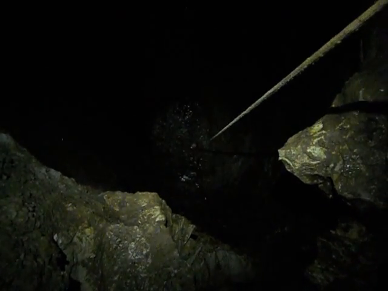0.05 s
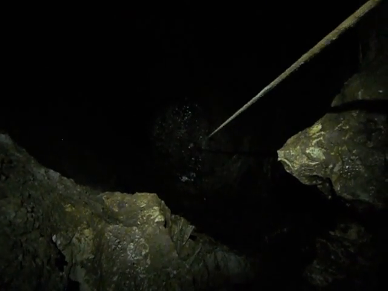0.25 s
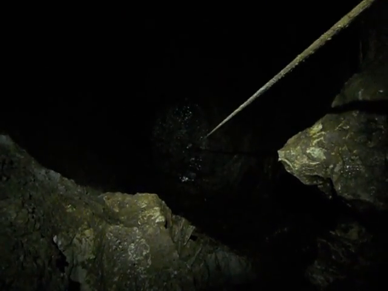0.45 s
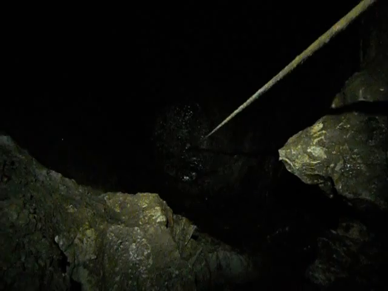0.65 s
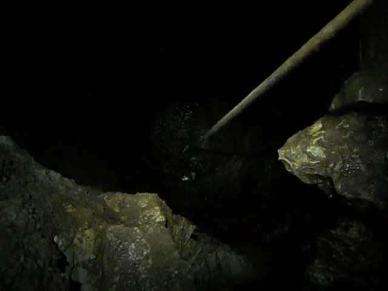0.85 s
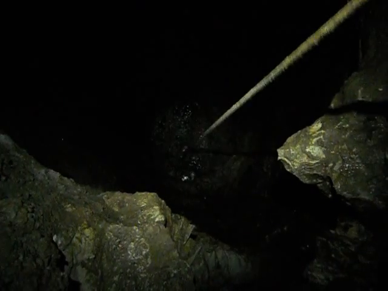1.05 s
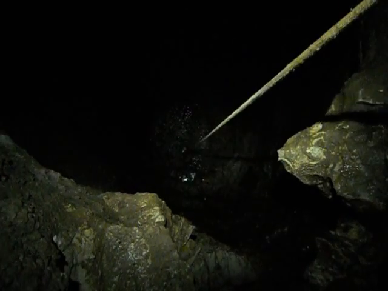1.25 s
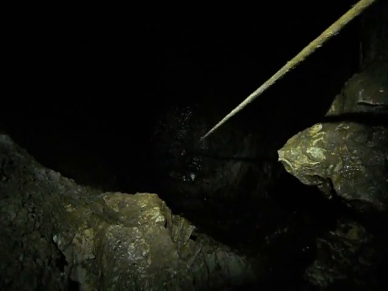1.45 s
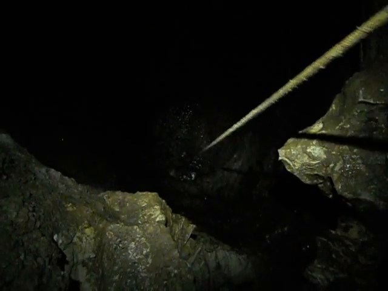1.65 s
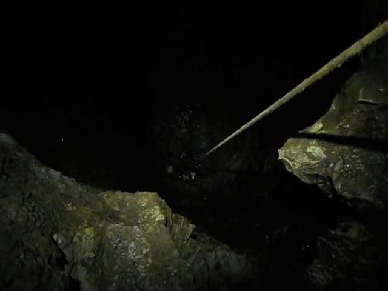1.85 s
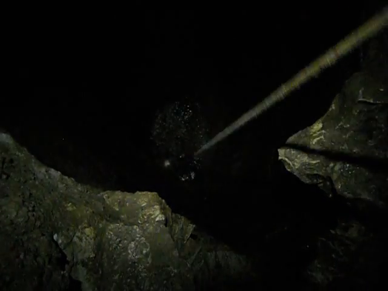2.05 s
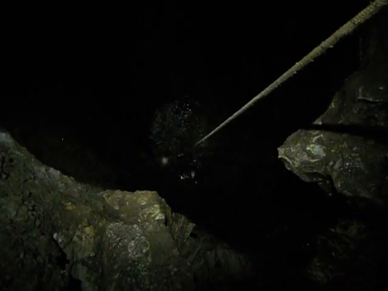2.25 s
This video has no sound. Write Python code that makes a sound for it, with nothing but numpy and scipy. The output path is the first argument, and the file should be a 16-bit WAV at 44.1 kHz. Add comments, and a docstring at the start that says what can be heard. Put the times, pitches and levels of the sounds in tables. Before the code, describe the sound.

A stone falls down a deep cave pit, heard from the rim. Soft rustles and a faint dying rumble come first. At about 0.6 seconds the stone clips the wall with a sharp, very quick double knock and a bright echo. At 0.9 seconds it lands far below, raising a low boom that rolls back in waves and slowly fades. Faint drips tick from 1.4 seconds, mostly around 2.

```python
"""A stone falls down a deep cave pit, clipping the wall with a sharp double knock.
Each blow snaps, crushes a little grit and rings the stone; the shaft answers with a bright clack.
The landing far below piles its echoes into a low boom that rolls back up in waves.
Soft rustles come and go near the rim, and a few drips tick over the cave air as the boom fades."""
import sys
import numpy as np
from scipy import signal
from scipy.fft import rfft, irfft, next_fast_len
from scipy.io import wavfile

SR = 44100
rng = np.random.default_rng(int(sys.argv[2]) if len(sys.argv) > 2 else 0)


def dump_mix(stems):
    """Bounce the given channels to the path in sys.argv[1] as a 16-bit WAV at rate SR."""
    frames = np.atleast_2d(stems).T  # one column per channel
    limited = np.clip(frames, -1, 1)  # hard clip at full scale
    pcm = np.round(limited * 32767).astype(np.int16)
    wavfile.write(sys.argv[1], SR, pcm)


N = 101429
TIME = np.arange(N) / SR

# glancing blows: (time [s], level [dB], snap pitch [Hz], contact time [s], send to the shaft [dB])
BLOWS = [(0.5775, -11.5, 3594, 0.00067, -9.5), (.5894, 0.5, 5115, 0.000283, 0)]
# the stone's ring: (frequency [Hz], relative level [dB], t60 [s])
STONE_MODES = [(1298, -14.5, 0.022), (2080, -11, 0.021), (2600, -5.5, 0.021), (3012, -6.5, 0.043),
               (3468, -6.5, 0.0127), (3738, -8, .018), (4955, -12, 0.021), (5134, -2, 0.0124),
               (5510, -10.5, 0.022), (6900, -11, 0.017)]
# rock crushed at the contact: (frequency [Hz], relative level [dB])
GRIT_SPECTRUM = [(200, -19.5), (700, -5.5), (1600, 5.5), (4000, 1.5), (6500, 1.5), (9000, 1.5),
                 (13000, -5.5)]
# slaps off the nearest walls: (delay [s], level [dB])
WALL_ECHOES = [(.0023, -15.5), (.0046, -13.5), (0.0113, -9.5)]
# the shaft's answer to a knock: (frequency [Hz], relative level [dB])
CLACK_SPECTRUM = [(100, -39), (350, -15.5), (700, -5), (1350, 0.5), (2000, -1.5), (2750, 1), (4200, -0.5),
                  (5400, 4), (5900, -4.5), (8000, -8), (14000, -20.5)]
# its tail: (frequency [Hz], t60 [s])
CLACK_DECAY = [(300, 1.84), (1300, 1.497), (3000, 1.319), (5400, 0.962), (7500, 0.898), (12000, 1.13)]
# the landing: (frequency [Hz], relative level [dB])
BOOM_SPECTRUM = [(22, -33.5), (32, -20.5), (42, -5), (56, -21), (90, -4), (125, 0.5), (168, 0.5),
                 (205, -2.5), (290, -4), (370, -2.5), (470, -6.5), (570, -9.5), (780, -8.5), (1300, -14.5),
                 (2200, -21), (5000, -24), (12000, -36.5)]
# the tail of boom and rumble: (frequency [Hz], t60 [s])
SHAFT_DECAY = [(40, 10.94), (110, 4.5), (180, 4.35), (400, 3.137), (900, 2.553), (2500, 2.476),
               (8000, 1.28)]
# the boom's low waves: (time [s], attack [s], hold [s], t60 [s], level [dB], pitch [Hz], width [Hz])
BOOM_SURGES = [(1.028, 0.0755, 0.0193, 0.69, -26.5, 171.1, 30),
               (1.288, 0.052, 0.126, 0.58, -33.5, 175, 111)]
# rustles at the rim: (time [s], attack [s], hold [s], base t60 [s], level [dB],
# resonance [Hz], resonance mix [dB], starting pitch offset [Hz])
RIM_RUSTLES = [(-.01, 0.026, 0.0434, 0.74, -39.5, 4130, -8, 99),
               (.17, 0.0618, 0.0146, 1.088, -31.5, 3764, -7.5, -800),
               (0.47, 0.038, 0.077, 0.306, -31, 3812, -7, 499.5),
               (0.896, 0.0496, 0.1277, 1.607, -35.5, 3637, -3, -120)]
# their rubbing tone: (frequency [Hz], relative level [dB])
RUSTLE_SPECTRUM = [(200, -15), (700, -1.5), (1200, 0), (1700, -1), (2150, 1.5), (2850, -1), (4400, 1.5),
                   (6500, -1.5), (8000, -3.5), (10000, -3), (14000, -9)]
# how long each band hangs on: (frequency [Hz], t60 stretch [factor])
RUSTLE_STRETCH = [(1000, 2.86), (4000, 1.302), (10000, 0.656)]
# drips and spatters: (time [s], level [dB], pitch [Hz], spread [octaves], attack [s], t60 [s])
CAVE_DRIPS = [(1.372, -44.5, 5530, 0.11, 0.016, 0.31), (1.896, -42.5, 9200, 0.49, .002, 0.069),
              (1.928, -49.5, 6810, 0.244, 0.0126, 0.112), (2.025, -46.5, 6900, 0.32, .012, 0.13),
              (2.05, -50.5, 6010, 0.12, 0.016, 0.47), (2.074, -47, 10500, .3, .002, .06),
              (2.194, -41, 10000, 0.514, 0.0029, 0.095)]
# a rumble already dying in the shaft: (frequency [Hz], relative level [dB])
RUMBLE_SPECTRUM = [(30, -21), (90, -8), (160, 2.5), (240, -6), (600, -10.5), (1400, -6.5), (2100, -22),
                   (6000, -10.5), (14000, -19)]
# faint swells in the shaft: (time [s], attack [s], level [dB], t60 [s])
SHAFT_SWELLS = [(.5, 0.077, -39, 0.153), (2.215, 0.0776, -43.5, 1.57)]
# their dull tone: (frequency [Hz], relative level [dB])
SWELL_SPECTRUM = [(60, -9), (250, 0), (700, 0), (1500, -5.5), (2400, -8.5), (3500, -18.5), (12000, -32)]
# cave air and hiss: (frequency [Hz], relative level [dB])
AIR_SPECTRUM = [(25, -0.5), (45, 8), (80, -2.5), (160, 9), (400, 0.5), (1200, -6), (4000, -9), (6500, -8.5),
                (9000, -10), (14000, -10.5)]
# microphone colour: (frequency [Hz], gain [dB])
MIC_EQ = [(20, -1), (9000, 0.5), (10200, -0.5), (11050, -13.5), (11800, -7.5), (12500, -13.5),
          (13500, -27.5), (14200, -32.5)]

RING_DB, GRIT_DB, GRIT_T60_S = -12, -3, 0.00796
CLACK_DB, CLACK_RING_DB, CLACK_WIDTH_HZ, WALL_ATTACK_S = -17.5, -10, 42.6, 0.00165
THUD_DB, THUD_HZ, THUD_WIDTH_HZ, THUD_T60_S = -25, 482.5, 600, 0.0023
BOOM_START_S, BOOM_DB, BOOM_ATTACK_S, BOOM_HOLD_S = 0.902, -24, 0.0161, 0.239
RUSTLE_WIDTH_HZ, GLIDE_S, RING_HOLD_FACTOR = 452, 0.053, 1.934
GRAIN_DB, GRAIN_HZ = 0.99, 250
DRIP_ECHO_DB, DRIP_ECHO_T60_S = -15, 0.81
AIR_DB, RUMBLE_DB = -43, -37.5
DETECTOR_S, THRESHOLD_DB, DUCK_SHARE, RELEASE_DB_PER_S = 0.00623, -21.5, 0.354, 22
CLIP_CEILING, LOWPASS_HZ = 0.92, 14150


def knock(start, db, hz, contact):
    """Stone meets rock: a contact snap, the stone's short ring and a puff of grit."""
    age = np.maximum(TIME - start, 0)
    progress = age / contact
    snap = progress * np.exp(1 - progress) * np.sin(2 * np.pi * hz * age)
    ring = sum((-1) ** k * amp(level) * fall(age, t60) * np.sin(2 * np.pi * mode_hz * age)
               for k, (mode_hz, level, t60) in enumerate(STONE_MODES))
    grit = amp(GRIT_DB) * wash(GRIT_SPECTRUM) * np.minimum(progress, 1) * fall(age, GRIT_T60_S)
    return amp(db) * (snap + amp(RING_DB) * ring) + amp(db / 2) * grit  # soft blows are grittier


def wall_thud():
    """The rock wall gives a short dull push at the first contact."""
    start = BLOWS[0][0]
    body = amp(THUD_DB) * band(THUD_HZ, THUD_WIDTH_HZ)
    return body * rise(start, WALL_ATTACK_S) * fall(TIME - start, THUD_T60_S)


def shaft_clack():
    """Each blow feeds dense echoes, tinted by the stone's modes; they fade from the last blow on."""
    ring = unit(sum(amp(db) * band(hz, CLACK_WIDTH_HZ) for hz, db, _ in STONE_MODES))
    echoes = wash(CLACK_SPECTRUM) + amp(CLACK_RING_DB) * ring
    power = sum((amp(send) * rise(start, WALL_ATTACK_S)) ** 2 for start, *_, send in BLOWS)
    return amp(CLACK_DB) * np.sqrt(power) * fade_bands(echoes, BLOWS[-1][0], CLACK_DECAY)


def wall_blows():
    """The double knock with its near-wall slaps, thud and bright tail."""
    direct = sum(knock(*row[:4]) for row in BLOWS)
    slaps = sum(amp(db) * np.roll(direct, round(delay * SR)) for delay, db in WALL_ECHOES)
    return direct + slaps + wall_thud() + shaft_clack()


def boom():
    """The landing arrives as dense echoes that pile up, then fade, the bass last."""
    echoes = fade_bands(wash(BOOM_SPECTRUM), BOOM_START_S + BOOM_HOLD_S, SHAFT_DECAY)
    return amp(BOOM_DB) * rise(BOOM_START_S, BOOM_ATTACK_S) * echoes


def surge(start, attack, hold, t60, db, hz, width):
    """The boom returns from the depth on the shaft's low resonance."""
    return amp(db) * band(hz, width) * rise(start, attack) * fall(TIME - start - attack - hold, t60)


def rustle(start, attack, hold, t60, db, hz, ring_db, glide_hz):
    """Fine rubbing grain swells and fades; its one resonance slides into place."""
    offset_hz = glide_hz * np.exp(-np.maximum(TIME - start, 0) / GLIDE_S)
    resonance = signal.hilbert(band(hz, RUSTLE_WIDTH_HZ), next_fast_len(N))[:N]
    ring = (resonance * np.exp(2j * np.pi * np.cumsum(offset_hz) / SR)).real
    ring_fade = fall(TIME - start - attack - RING_HOLD_FACTOR * hold, t60)
    grain = amp(GRAIN_DB * band(0, 2 * GRAIN_HZ))
    rub = fade_bands(grain * wash(RUSTLE_SPECTRUM), start + attack + hold, RUSTLE_STRETCH, t60)
    return amp(db) * rise(start, attack) * (rub + amp(ring_db) * ring * ring_fade)


def drip(start, db, hz, octaves, attack, t60):
    """A drop lands as a high splat with a faint echo."""
    splat = noise(lambda f: 1 / (1 + (np.log2((f + 1) / hz) / octaves) ** 2))
    age = TIME - start - attack
    tail = fall(age, t60) + amp(DRIP_ECHO_DB) * fall(age, DRIP_ECHO_T60_S)
    return amp(db) * splat * rise(start, attack) * tail


def cave_bed():
    """Steady air, a dying rumble and faint dull swells."""
    air = amp(AIR_DB) * wash(AIR_SPECTRUM)
    rumble = amp(RUMBLE_DB) * fade_bands(wash(RUMBLE_SPECTRUM), 0, SHAFT_DECAY)
    swell = sum(amp(db) * rise(start, attack) * fall(TIME - start - attack, t60)
                for start, attack, db, t60 in SHAFT_SWELLS)
    return air + rumble + swell * wash(SWELL_SPECTRUM)


def amp(db):
    """Decibels to gain."""
    return 10 ** (np.asarray(db) / 20)


def unit(x):
    """Scales to rms 1."""
    return x / np.sqrt(np.mean(x ** 2) + 1e-20)


def curve(points, hz):
    """Reads a table along a log-frequency axis."""
    f, value = np.transpose(points)
    return np.interp(np.log(hz + 1), np.log(f), value)


def colour(x, gain):
    """EQ by a gain that depends on frequency."""
    size = 2 * next_fast_len(len(x))
    return irfft(rfft(x, size) * gain(np.fft.rfftfreq(size, 1 / SR)), size)[:len(x)]


def noise(gain):
    """Noise of rms 1 with the given colour."""
    return unit(colour(rng.standard_normal(N), gain))


def wash(spectrum):
    """Noise of rms 1 with a tabled spectrum."""
    return noise(lambda hz: amp(curve(spectrum, hz)))


def band(hz, width):
    """Noise ringing in one resonance."""
    return noise(lambda f: 1 / (1 + (2 * (f - hz) / width) ** 2))


def rise(start, length):
    """A straight attack from silence to full level."""
    return np.clip((TIME - start) / length, 0, 1)


def fall(age, t60):
    """Exponential decay once the age passes zero."""
    return np.exp(-np.log(1000) * np.maximum(age, 0) / t60)


def fade_bands(x, start, decay, scale=1):
    """From start on, each band fades with a t60 of scale times its table value."""
    hz, t, bands = signal.stft(x, SR, nperseg=512)
    t60 = scale * curve(decay, hz)[:, None]
    return signal.istft(bands * fall(t - start, t60), SR)[1][:N]


def scene():
    """The mono mix, heard from the rim of the pit."""
    rustles = sum(rustle(*row) for row in RIM_RUSTLES)
    drips = sum(drip(*row) for row in CAVE_DRIPS)
    landing = boom() + sum(surge(*row) for row in BOOM_SURGES)
    return (wall_blows() + landing + rustles + drips + cave_bed())[None]


def record(dry):
    """A compressor that ducks after the knock, then soft clipping, microphone colour and a low-pass."""
    x = dry[0]
    pole = np.exp(-1 / (DETECTOR_S * SR))
    power_db = 10 * np.log10(signal.lfilter([1 - pole], [1, -pole], x ** 2) + 1e-12)
    release_db = RELEASE_DB_PER_S * TIME
    held_db = np.maximum.accumulate(power_db + release_db) - release_db  # peaks let go slowly
    ducked = x * amp(-DUCK_SHARE * np.maximum(held_db - THRESHOLD_DB, 0))
    clipped = ducked / (1 + (ducked / CLIP_CEILING) ** 6) ** (1 / 6)
    toned = colour(clipped, lambda hz: amp(curve(MIC_EQ, hz)))
    lowpass = signal.firwin(511, LOWPASS_HZ, window=("kaiser", 9), fs=SR)
    return signal.oaconvolve(toned, lowpass, "same")[None]


dry = scene()
out = record(dry)
dump_mix(out)
```